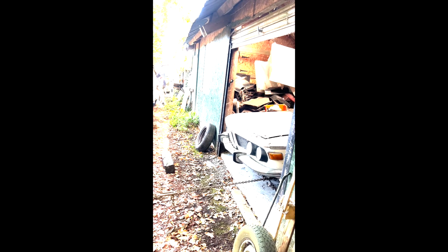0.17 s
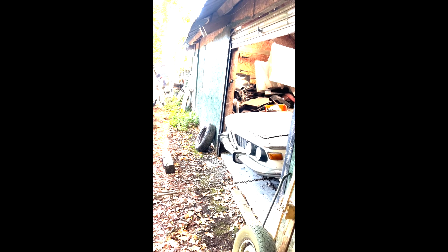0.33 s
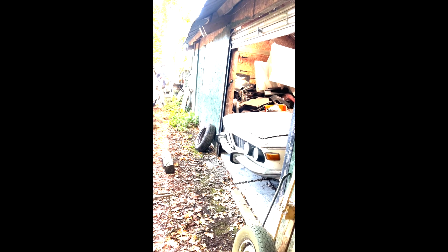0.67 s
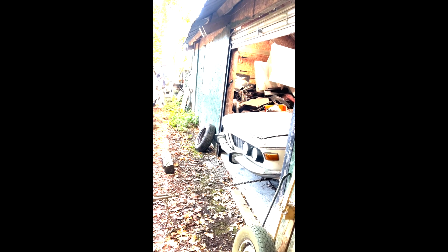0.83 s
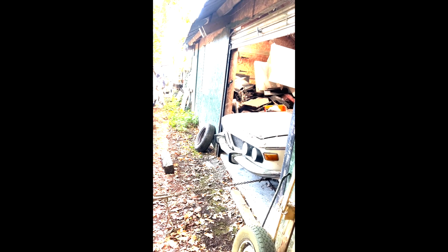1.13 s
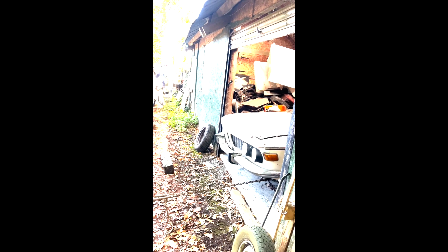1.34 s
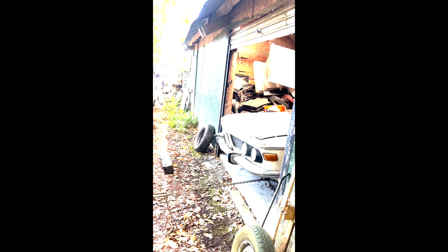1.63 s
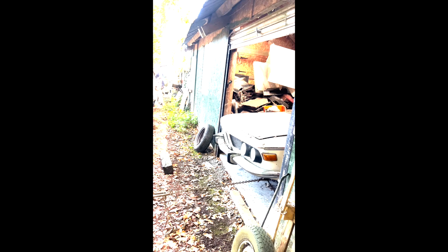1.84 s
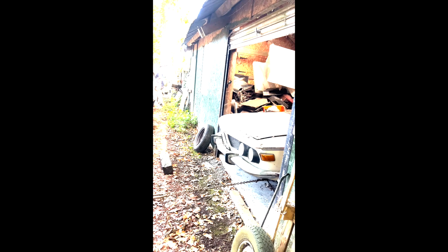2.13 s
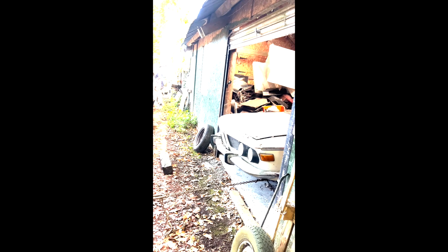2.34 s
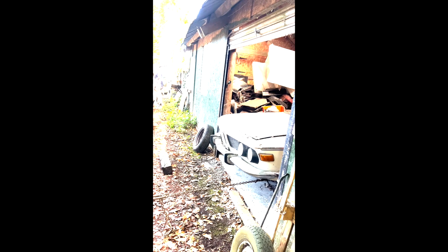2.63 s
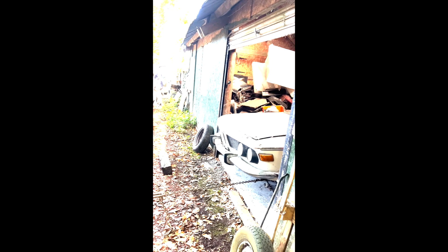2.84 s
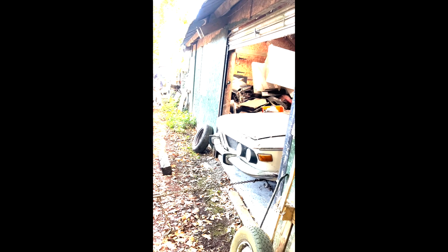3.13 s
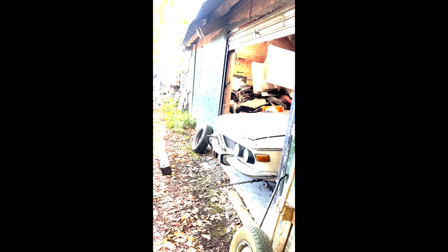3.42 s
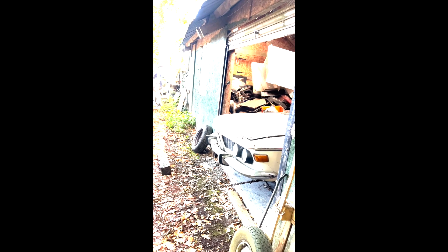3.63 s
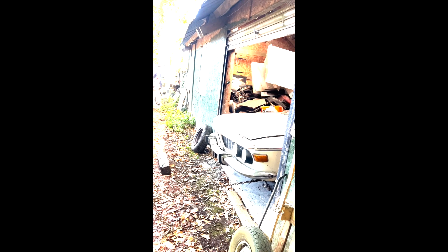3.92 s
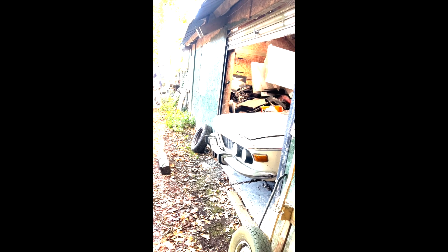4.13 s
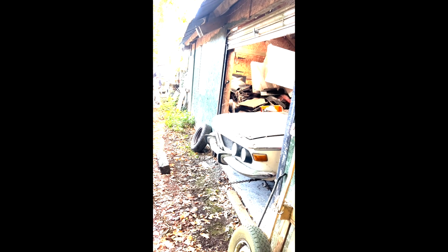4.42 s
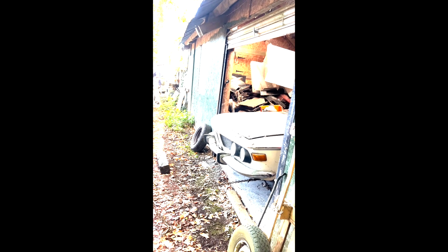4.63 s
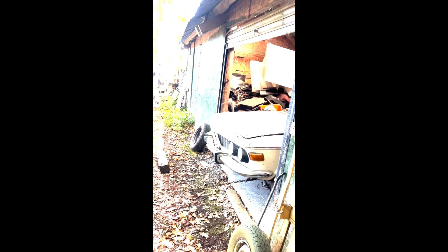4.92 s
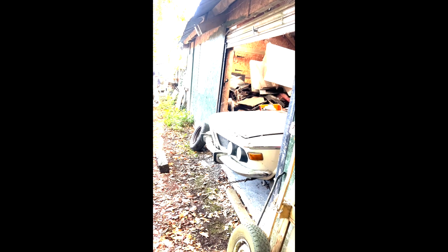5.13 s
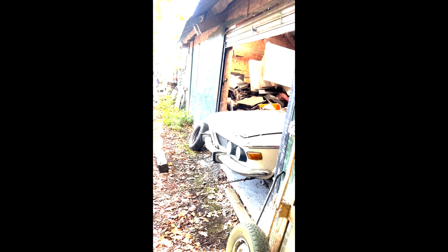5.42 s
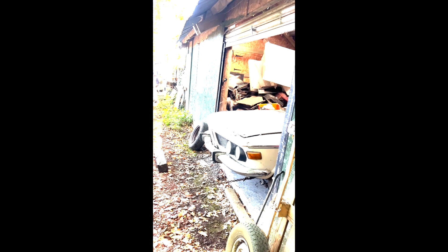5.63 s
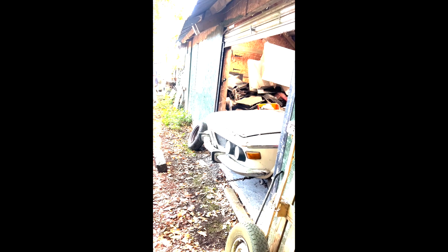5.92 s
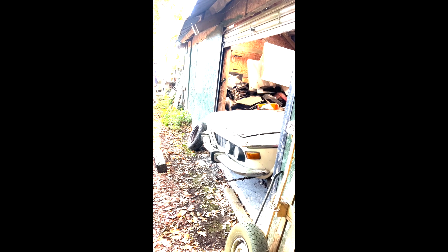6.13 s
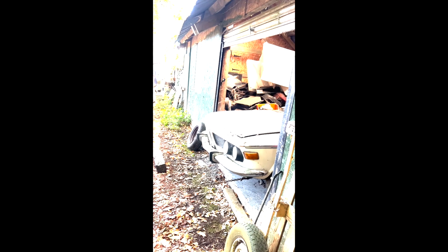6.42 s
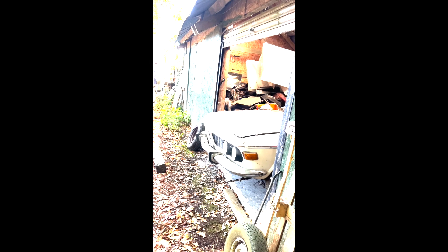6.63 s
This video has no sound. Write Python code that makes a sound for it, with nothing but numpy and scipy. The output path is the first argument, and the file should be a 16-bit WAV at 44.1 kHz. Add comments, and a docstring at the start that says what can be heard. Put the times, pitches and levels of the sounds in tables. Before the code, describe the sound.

A hand-cranked geared winch grinds and whines through five short pulls, its pawl clacking tooth by tooth, over a low steady engine idle outdoors.

```python
"""A tow car idles throughout a yard while a geared winch on a steel trailer hauls a car in five short pulls.
They start near 0.07, 1.43, 2.68, 4.20 and 5.83 s: gear orders whine, and rough contacts grind frame and housing.
The pawl chatters up each tooth, drops and rings modes; jolts knock the deck, loose steel pings, the handle clacks.
As each pull ends, grind and whine fade while the slack pawl still clacks.
Two ports, apart in phase and level, hear it all with a short diffuse part that spreads the stereo."""
import sys
import numpy as np
from scipy import signal
from scipy.fft import rfft, irfft, next_fast_len
from scipy.io import wavfile
from scipy.ndimage import uniform_filter1d, map_coordinates

SR = 44100
rng = np.random.default_rng(int(sys.argv[2]) if len(sys.argv) > 2 else 0)


def pcm_store(signal):
    """Save signal as 16-bit PCM."""
    levels = np.round(np.clip(np.atleast_2d(signal), -1, 1) * 32767)
    wavfile.write(sys.argv[1], SR, levels.astype(np.int16).T)


N = 298998  # samples

# pulls: (gear catch [s], swell [s], handle stop [s], run-down [s], grind [dB],
#         extra grind at the catch [dB], bright grind over it [dB])
PULL_STROKES = [(.066, 0.12, 0.58, 0.088, -25, -14.5, -4), (1.43, 0.11, 2.006, 0.065, -25.5, -16, -3.5),
                (2.682, 0.17, 3.4, 0.051, -26, -8, -3.5), (4.198, 0.15, 4.865, 0.098, -25, -13, -3.5),
                (5.828, 0.12, 6.326, 0.099, -25.5, -17, -3.5)]
# pawl contacts: (peak time [s], pawl ring [dB], wheel clank [dB], bracket clank [dB])
PAWL_CONTACTS = [(0.066, -47, -37, -53), (.203, -41, -31, -34), (.249, -38, -32, -47),
                 (0.357, -25, -23.5, -26), (0.476, -29.5, -23, -27), (0.568, -29, -31.5, -46),
                 (0.651, -34, -34, -54), (0.692, -61, -44, -44), (1.432, -41.5, -40.5, -57),
                 (1.593, -55, -46, -48), (1.774, -38, -37, -32), (1.868, -35, -29, -34),
                 (1.938, -31.5, -29.5, -27.5), (2.026, -37.5, -50, -32), (2.121, -48, -38, -48),
                 (2.146, -58, -45, -39.5), (2.25, -60, -45.5, -47), (2.683, -56, -35.5, -38),
                 (2.771, -46, -40, -42), (2.871, -39, -34, -25.5), (2.959, -34, -29.5, -49),
                 (3.045, -38, -31.5, -42), (3.136, -32, -22.5, -25), (3.217, -30, -28, -29),
                 (3.29, -28.5, -26.5, -37), (3.372, -25, -25, -27), (3.489, -38, -33, -40),
                 (3.575, -48, -43, -39.5), (3.697, -53, -43, -45), (4.2, -59, -38, -36),
                 (4.252, -57, -54, -44), (4.281, -55, -48, -40), (4.355, -42, -31, -32),
                 (4.479, -30, -26.5, -45), (4.601, -27, -27, -45), (4.723, -25.5, -25.5, -28),
                 (4.778, -46, -25.5, -24), (4.844, -26, -27, -33), (5.829, -44, -42.5, -38),
                 (6.11, -46, -29.5, -24.5), (6.227, -34.5, -34, -38), (6.317, -40, -31, -36),
                 (6.35, -64, -56, -46), (6.437, -42, -49, -52), (6.453, -44, -37.5, -41),
                 (6.72, -60, -60, -56)]
# stereo spread: (frequency [Hz], level of the diffuse part to the direct sound [dB])
DIFFUSE_LEVELS = [(30, -53), (150, -32.5), (400, -20), (700, -12.5), (1300, -10), (2500, -10), (4000, -2),
                  (5200, -0.5), (6000, -23), (7200, -10), (9000, -8), (10200, -56), (12000, -28),
                  (14000, -6)]


def amp(db):
    """Amplitude ratio of a level in dB."""
    return 10 ** (np.asarray(db) / 20)


def unit(x):
    """x scaled to rms 1."""
    return x / np.sqrt(np.mean(x ** 2) + 1e-20)


def along(points, hz):
    """(Hz, value) points interpolated on a log frequency axis."""
    f, v = np.transpose(points)
    return np.interp(np.log(hz + 1), np.log(f + 1), v)


def wobble(rate):
    """A smooth random curve, rate knots a second."""
    knots = rng.standard_normal(int(N * rate / SR) + 4)
    return map_coordinates(knots, [np.arange(N) * rate / SR])


def filtered(x, response):
    """x times a complex response of frequency."""
    m = next_fast_len(N + SR // 2)
    return irfft(rfft(x, m) * response(np.fft.rfftfreq(m, 1 / SR)), m)[..., :N]


def modes(table):
    """Causal response of (frequency [Hz], width [Hz], level [dB]) resonances, alternating in sign."""
    def response(f):
        total = 0
        for k, (hz, width_hz, db) in enumerate(table):
            damping = 1j * f * width_hz
            total = total + (-1) ** k * amp(db) * damping / (hz * hz - f * f + damping)
        return total
    return response


def gritty(spread_db):
    """Dense noise contacts of uneven but bounded size, rms 1."""
    return unit(rng.standard_normal(N) * amp(spread_db * np.tanh(wobble(1200))))


def port_air():
    """Faint low air noise, opposite in the two ports."""
    level_db = -60
    rumble = filtered(rng.standard_normal(N), lambda f: modes([(60, 70, 0)])(f) ** 2)
    return amp(level_db) * np.outer([1, -1], unit(rumble))


def gusting_air():
    """Low air noise: a steady floor plus bell-shaped gusts."""
    floor_db, gust_width_s = -43.5, 0.09
    # gusts: (time [s], level [dB])
    gusts = [(.82, -38), (1.19, -36)]
    t = np.arange(N) / SR
    air = unit(filtered(rng.standard_normal(N), lambda f: modes([(65, 70, 0)])(f) ** 2))
    level = amp(floor_db) + sum(amp(db) * np.exp(-((t - s) / gust_width_s) ** 2) for s, db in gusts)
    return level * amp(2.4 * wobble(15)) * air


def idling():
    """Engine: exhaust orders, steady hum, noise puffing at the firing rate and a valve tick per firing."""
    firing_hz, bed_db = 32.51, -39.5
    # exhaust orders: (multiple of the firing rate, relative level [dB])
    exhaust = [(1, -61), (2, -48.5), (3, -43.5), (4, -48.5), (5, -48), (7, -49)]
    # steady low tones: (frequency [Hz], relative level [dB])
    hum = [(54.4, -40.5), (61.9, -45.5), (136, -55), (334, -61.5), (414.5, -66), (527, -59)]
    # engine noise spectrum: (frequency [Hz], density [dB per Hz])
    idle_spectrum = [(20, -30), (55, 0.5), (100, -4.5), (230, -10), (310, -16), (700, -19.5), (820, -21),
                     (1200, -16.5), (1500, -20), (2000, -26.5), (2900, -26), (3700, -34), (4600, -34),
                     (7000, -43), (13000, -48.5), (16000, -45)]
    t = np.arange(N) / SR
    turn = 2 * np.pi * firing_hz * t + .1 * wobble(1.5)
    tones = np.zeros(N)
    for k, db in exhaust:
        tones += amp(db + 4.0 + 1.1 * wobble(6.1)) * np.sin(k * turn + rng.uniform(0, 2 * np.pi))
    for hz, db in hum:
        tones += amp(db + 2.0 + wobble(2.52)) * np.sin(2 * np.pi * hz * t + 0.41 * wobble(2.1))

    def pulsed(f):  # share of the noise power that puffs
        return np.clip(np.log(f / 300 + 1e-9), 0, 1) * (0.34 + .7 / (1 + (f / 2500) ** 2))

    puff = amp(3 * np.cos(turn - 2.2) + np.cos(2 * turn - 4.4))
    white = rng.standard_normal((2, N))
    bed = filtered(unit(puff * white[0]), lambda f: amp(along(idle_spectrum, f)) * np.sqrt(pulsed(f)))
    bed += filtered(white[1], lambda f: amp(along(idle_spectrum, f)) * np.sqrt(1 - pulsed(f)))

    beats = np.flatnonzero(np.diff(np.floor((turn - 1.57) / (2 * np.pi))))
    ticks = np.zeros(N)
    ticks[beats] = amp(-1.5 + 2 * rng.standard_normal(len(beats)))
    valves = filtered(ticks, modes([(990, 94, -9), (1233, 59, -2.5), (3070, 240, -29)]))
    return tones + valves + amp(bed_db) * unit(bed)


def deck():
    """Load jolts knock the trailer deck: a rough 12 ms shove into its low modes."""
    # jolts: (time [s], relative level [dB])
    knocks = [(0.359, -13), (0.474, -18), (1.933, -28), (3.05, -15), (4.79, -3.5), (4.86, -14.5)]
    # deck modes: (frequency [Hz], width [Hz], level [dB])
    deck_modes = [(193, 57, -14), (251, 39, -12), (357, 19, 1)]
    length = 530  # samples
    shove = np.zeros(N)
    swing = np.sin(2 * np.pi * 250 * np.arange(length) / SR)
    for s, db in knocks:
        rough = swing + 0.95 * rng.standard_normal(length)
        shove[round(s * SR) - length // 2:][:length] += amp(db + 5.0) * np.hanning(length) * rough
    return filtered(shove, modes(deck_modes))


def loose_parts():
    """Links, pins and the slack handle: decaying sines with a soft attack and slightly random pitch."""
    ping_t60_s, glint_hz, glint_t60_s = 0.15, 13100, 0.086
    # links and pins: (time [s], pitch [Hz], level [dB])
    pings = [(.615, 3600, -34), (.71, 3020, -45), (.675, 852, -40), (.70, 800, -39), (1.872, 1561, -31),
             (1.96, 1550, -31), (2.045, 1345, -36), (2.115, 3560, -37), (2.245, 3510, -46),
             (2.69, 2955, -47), (3.155, 1502, -26), (3.235, 640, -39), (3.46, 3630, -32),
             (3.492, 1494, -34.5), (3.697, 950, -39), (4.206, 2958, -51), (6.325, 1526, -26.5),
             (6.325, 2044, -28.5), (6.365, 2510, -42), (6.61, 978, -35.5), (6.612, 5370, -49),
             (6.70, 3564, -43)]
    # very high tinks of a tiny pin: (time [s], level [dB])
    glints = [(0.3301, -48), (0.38, -48), (1.7837, -49), (1.9594, -43), (2.0436, -43), (2.7985, -53),
              (2.8913, -47), (3.0117, -57), (3.3014, -41), (3.4175, -51), (4.3625, -48), (4.775, -40),
              (6.111, -50), (6.239, -41), (6.4648, -51)]
    # handle clacking back: (time [s], level [dB])
    handle_clacks = [(.655, -43), (2.128, -48), (2.15, -41), (3.70, -47), (6.453, -34)]
    # handle modes: (frequency [Hz], level [dB], t60 [s])
    handle_modes = [(650, 2, 0.12), (1134, -2, 0.2), (1770, 1, 0.074), (2300, -1, 0.11), (2860, -11, .1)]
    rings = [(s, hz, db, ping_t60_s, .0029) for s, hz, db in pings]
    rings += [(s, glint_hz, db, glint_t60_s, .0004) for s, db in glints]
    for s, db in handle_clacks:
        for hz, mode_db, t60_s in handle_modes:
            rings.append((s, hz, db + mode_db + rng.normal(0, 1.8), t60_s, .001))
    out, t = np.zeros(N + SR), np.arange(SR // 4) / SR
    for s, hz, db, t60_s, attack_s in rings:
        envelope = amp(db - 60 * t / t60_s) * (1 - np.exp(-t / attack_s))
        out[round(s * SR):][:len(t)] += envelope * np.sin(2 * np.pi * hz * rng.normal(1, 0.0032) * t)
    return out[:N]


def pawl():
    """The pawl scrapes up each tooth in swelling chatter, drops, and rings with its wheel and bracket."""
    taut_lead_s, slack_lead_s, min_lead_s = 0.028, 0.035, 0.0061  # scrape before the drop
    taut_t60_s, slack_t60_s = 0.14, 0.17  # chatter after it
    drop_db, drop_t60_s = -3.5, 0.0037  # over the chatter
    taut_strike_db, slack_strike_db = 15, 16  # mode-exciting impulse over the contact level
    fade_in_power = 0.54
    # modes of pawl, wheel and bracket: (frequency [Hz], width [Hz], level [dB])
    pawl_modes = [(3620, 196, -3.5), (3720, 70, -8.5), (5800, 89, 1), (6590, 160, -16), (7623, 33, -20),
                  (9001, 240, -24), (9320, 35, -14), (11320, 59, -20), (11870, 78, -27), (12940, 120, -17)]
    wheel_modes = [(1773, 40, -4.5), (2064, 65, 2), (2288, 22, -4), (2447, 63, 0.5), (2866, 33, 0.5),
                   (4580, 200, -9.5)]
    bracket_modes = [(610, 89, 2), (1035, 85, 1.5), (1300, 39, -2)]
    force, blow = np.zeros((2, 3, N))
    t = np.arange(N) / SR
    catch, _, stop, *_ = np.transpose(PULL_STROKES)
    for s, *parts_db in PAWL_CONTACTS:
        k = np.argmin(np.abs(s - (catch + stop) / 2))  # nearest pull
        taut = s < stop[k]
        # starts at the catch at the earliest, save for the minimum length
        lead_s = np.clip(s - catch[k], min_lead_s, taut_lead_s if taut else slack_lead_s)
        t60_s = taut_t60_s if taut else slack_t60_s
        near = slice(round((s - lead_s) * SR), round((s + .3) * SR))
        u = t[near] - s
        chatter = amp(np.where(u < 0, 7 * u / lead_s, -60 * u / t60_s))
        chatter *= np.clip(1 + u / lead_s, 0, 1) ** fade_in_power
        drop = (u >= 0) * amp(drop_db - 60 * np.abs(u) / drop_t60_s)
        force[:, near] += np.outer(amp(parts_db), chatter + drop)
        blow[:, round(s * SR)] = amp(np.add(parts_db, taut_strike_db if taut else slack_strike_db))
    ring, wheel, bracket = force * gritty(spread_db=4.5)
    scrape = filtered(wheel, lambda f: amp(6.5) * f * f / (f * f + 900 ** 2) / (1 + (f / 3000) ** 2))
    rasp = filtered(ring, lambda f: amp(-12.0) * (f / 4000) ** 2 / (1 + (f / 4000) ** 4))
    rung = amp(17.5) * filtered(ring + blow[0], modes(pawl_modes))
    rung += amp(16.0) * filtered(wheel + blow[1], modes(wheel_modes))
    rung += amp(15.0) * filtered(bracket + blow[2], modes(bracket_modes))
    return scrape + rasp + rung


def strokes():
    """Per sample: gears turning, age [s], catch swell and run-down 0-1, grind [dB], bright offset [dB]."""
    ring_down_t60_s = 0.23  # after rest
    catch, swell, stop, run_down, level_db, catch_db, bright_db = np.transpose(PULL_STROKES)
    t = np.arange(N) / SR
    k = np.clip(np.searchsorted(catch, t) - 1, 0, None)
    age = t - catch[k]
    since_rest = np.clip(t - stop[k] - run_down[k], 0, 9)
    turning = (age > 0) * amp(-60 * since_rest / ring_down_t60_s)  # full at once
    rising = (1 - np.clip(age / swell[k], 0, 1)) ** 2
    resting = np.clip((t - stop[k]) / run_down[k], 0, 1)
    return turning, np.clip(age, 0, 1), rising, resting, level_db[k] + catch_db[k] * rising, bright_db[k]


def load_db():
    """The frame eases as the pawl tops a tooth, then jolts; stronger contacts move it more."""
    ease_db, ease_s, jolt_db, jolt_s, jolt_late_s = -9, 0.014, 7, 0.015, 0.018
    half_clank_db, clank_range_db = -22, 29  # contact of half effect; span from none to full
    t, out = np.arange(N) / SR, np.zeros(N)
    for s, *parts_db in PAWL_CONTACTS:
        near = slice(round(s * SR) - 2000, round(s * SR) + 3000)
        share = np.clip(0.5 + (max(parts_db) - half_clank_db) / clank_range_db, 0, 1)
        u = t[near] - s
        ease = ease_db * np.exp(-(u / ease_s) ** 2)
        jolt = jolt_db * np.exp(-((u - jolt_late_s) / jolt_s) ** 2)
        out[near] += share * (ease + jolt)
    return out


def rattle():
    """Dense small impacts of chain, teeth and pins, each ringing briefly on its own note; rms 1."""
    impacts_per_s, spread_db = 260, 12  # spread: smallest to largest
    # impact spectrum: (frequency [Hz], level [dB])
    rattle_levels = [(500, 0.5), (1000, -2), (2000, -4), (3500, -5), (5500, -18), (9000, -30)]
    when, pitch, size = rng.random((int(N / SR * impacts_per_s), 3)).T
    low_hz, high_hz = rattle_levels[0][0], rattle_levels[-1][0]
    hz = low_hz * (high_hz / low_hz) ** pitch
    t60_s = 92 / (hz + 1500)
    t = np.arange(SR // 16)[:, None] / SR
    level_db = along(rattle_levels, hz) + spread_db * size
    rings = amp(level_db - 60 * t / t60_s) * np.sin(2 * np.pi * hz * t)
    where = (when * N).astype(int) + np.arange(len(t))[:, None]
    return unit(np.bincount(where.ravel(), rings.ravel())[:N])


def housing(x):
    """The gear housing rings; as the contact point wanders each mode is fed more or less."""
    depth_db, changes_per_s = 2.5, 7
    # housing modes: (frequency [Hz], width [Hz], relative level [dB])
    housing_modes = [(509.4, 28, 8.5), (650.3, 25, 11.5), (766, 15, 1.5), (948, 24, 4.5), (1236, 86, -2.5),
                     (2131, 33, 3), (2390, 36, -3), (2687, 61, 3.5), (2977, 46, -4), (3630, 140, -3.5),
                     (4200, 61, 2), (4580, 32, -24), (5330, 110, 8)]
    out = x.copy()
    for mode in housing_modes:
        out += filtered(x * amp(depth_db * wobble(changes_per_s) - 4.0), modes([mode]))
    return out


def whine(turn, orders_db, frame_db):
    """Tones on orders of the tooth rate, roughened in level and phase."""
    # other orders: (multiple of the tooth rate, level to the frame's grind [dB])
    shaft = [(.32, -13), (.58, -18.5), (5, -18.5)]
    orders = [(k + 1, db + 0.5) for k, db in enumerate(orders_db)]
    orders += [(k, frame_db + db) for k, db in shaft]
    return sum(amp(db + 3.5 * wobble(35)) * np.sin(k * turn + .36 * k * wobble(90)) for k, db in orders)


def grind(turn, turning, frame_db, bright_db):
    """Gritty contacts shake the frame; brighter grit swells and clicks once a tooth in the gears."""
    clicks_db = -6
    # frame and gear grit spectra: (frequency [Hz], density [dB per Hz])
    frame_spectrum = [(30, -12), (150, -13), (260, -5), (420, 3), (560, -4.5), (800, -4), (1200, -8),
                      (1800, -20), (4000, -34), (20000, -120)]
    gear_spectrum = [(300, -52), (1000, -2.5), (1600, 0.5), (2200, -0.5), (3000, 1.5), (3400, -5.5),
                     (5000, -11), (7000, -21), (10000, -29), (13000, -32), (16000, -51)]
    tooth = np.diff(np.floor(turn / (2 * np.pi) + .15 * wobble(400)), prepend=0) > 0
    clicks = amp(clicks_db) * unit(tooth * amp(3.4 * rng.standard_normal(N)))
    grit = gritty(spread_db=-1.5) * amp(3.2 * np.cos(turn)) + clicks
    frame = unit(filtered(gritty(spread_db=2.0), lambda f: amp(along(frame_spectrum, f))))
    gears = unit(filtered(grit, lambda f: amp(along(gear_spectrum, f))))
    shake_db = .8 * wobble(40)  # uneven teeth load both layers at once
    layers = amp(frame_db - 5.5) * frame + amp(bright_db - 5.0) * gears
    return housing(turning * amp(shake_db) * layers)


def drive():
    """Meshing teeth whine, grind frame and housing, rattle loose steel and ring the big gear wheel."""
    uneven_db = 0.91  # random unevenness of the load
    run_down_db, whine_rest_db = -18.5, -11.5  # change by the time the gears rest
    bright_catch_db, bright_gain_db_per_s, bright_rest_db = 1.5, 4, -12
    rattle_db = -10  # to the frame level
    # gear mesh: (time [s], tooth rate [Hz], relative whine on once, twice, three times it [dB, dB, dB])
    mesh = [(.1, 420, -57, -47, -53), (.18, 447.2, -26, -52, -32), (.3, 468.2, -39.5, -49, -42),
            (.38, 467, -29, -35, -35), (.5, 470, -30.5, -37, -41), (0.619, 459, -42, -56, -37.5),
            (1.472, 440, -56, -51, -59), (1.54, 468, -26, -32.5, -42), (1.62, 490.8, -32, -28.5, -46),
            (1.74, 480.3, -27, -36, -36), (1.9, 471, -33.5, -36, -43), (2.03, 456.6, -54, -40, -45),
            (2.73, 430.4, -53, -56, -47), (2.78, 444.6, -27.5, -49, -46), (2.86, 466.8, -33, -40, -35),
            (3.03, 463.4, -35, -34, -41), (3.2, 462.7, -29.5, -37, -38), (3.371, 463, -43, -28, -40),
            (3.42, 454, -48, -40, -58), (4.25, 435, -50, -53, -56), (4.31, 456.7, -28, -34, -44),
            (4.4, 474.2, -26.5, -30, -42), (4.519, 468.7, -37, -33, -41), (4.65, 459.7, -30, -31, -43),
            (4.779, 459.3, -29, -43, -30.5), (4.9, 465.7, -41, -42, -51), (5.88, 446, -46, -48, -50),
            (5.97, 479.6, -29, -30.5, -42), (6.07, 484, -30.5, -45, -56), (6.199, 481.5, -33.5, -32, -44),
            (6.33, 462, -28, -40, -50), (6.42, 455, -31, -59, -61)]
    turning, age, rising, resting, level_db, bright_db = strokes()
    s, *columns = np.transpose(mesh)
    teeth_hz, *orders_db = [np.interp(np.arange(N) / SR, s, c) for c in columns]
    turn = 2 * np.pi * np.cumsum(teeth_hz * (1 + .008 * wobble(25))) / SR
    effort_db = level_db + run_down_db * resting + uneven_db * wobble(14)
    frame_db = effort_db + load_db()
    bright_db = effort_db + bright_db + bright_catch_db * rising
    bright_db = bright_db + bright_gain_db_per_s * age + bright_rest_db * resting
    ground = grind(turn, turning, frame_db, bright_db)
    bell = filtered(ground, modes([(2945, 11.3, 8.4)]))  # gear wheel's longer-ringing mode
    rattling = turning * amp(frame_db + rattle_db) * rattle()
    whining = turning * amp(whine_rest_db * resting) * whine(turn, orders_db, frame_db)
    return bell + ground + rattling + whining


def diffuse(x):
    """Short, evenly coloured random tails, drawn anew every 1/14 s, set to the diffuse levels."""
    out, step = np.zeros(N + SR), SR // 14
    t = np.arange(SR // 8) / SR
    for start in range(0, N, step):
        spectrum = rfft(rng.standard_normal(len(t)) * amp(-60 * t / .08))
        even = spectrum / uniform_filter1d(np.abs(spectrum), size=5)
        tail = irfft(even, len(t)) * np.cos(np.pi / 2 * t / t[-1]) ** 2
        tailed = signal.fftconvolve(x[start:start + step], tail / np.linalg.norm(tail))
        out[start:start + len(tailed)] += tailed
    return filtered(out[:N], lambda f: amp(along(DIFFUSE_LEVELS, f)))


def scene():
    """Sum the sources, add the diffuse part, and split phase and level between the two ports."""
    # left port's phase lead: (frequency [Hz], phase [rad])
    lead_rad = [(0, 0), (1640, 0), (2600, 2.6), (3700, 3.1), (6100, 3.2), (8100, 6.3), (10250, 9.4),
                (12400, 12.6), (16000, 17.9)]
    # left over right: (frequency [Hz], level [dB])
    left_db = [(60, 0), (130, 0), (280, 0.3), (620, 2.5), (1340, 4), (2500, 0.5), (6310, 0), (13700, 0)]
    side = np.array([[.5], [-.5]])

    def ports(extra_rad):
        return lambda f: np.exp(1j * side * (np.interp(f, *np.transpose(lead_rad)) + extra_rad))

    def share(f):  # the root keeps the power of direct plus diffuse sound
        return amp(side * along(left_db, f)) / np.sqrt(1 + amp(2 * along(DIFFUSE_LEVELS, f)))

    sound = idling() + gusting_air() + deck() + loose_parts() + pawl() + drive()
    # the diffuse part gets a further half turn between the ports
    heard = filtered(sound, ports(0)) + filtered(diffuse(sound), ports(np.pi))
    return filtered(heard, share) + port_air()


def record(dry):
    """Limit the treble: a steep slope above 14.1 kHz, nothing above 14.3 kHz."""
    top_hz, slope_start_hz, slope_db_per_khz = 14300, 14100, -20

    def response(hz):
        return (hz <= top_hz) * amp(slope_db_per_khz * np.clip(hz - slope_start_hz, 0, None) / 1000)

    return filtered(dry, response)


dry = scene()
out = record(dry)
pcm_store(out)
```